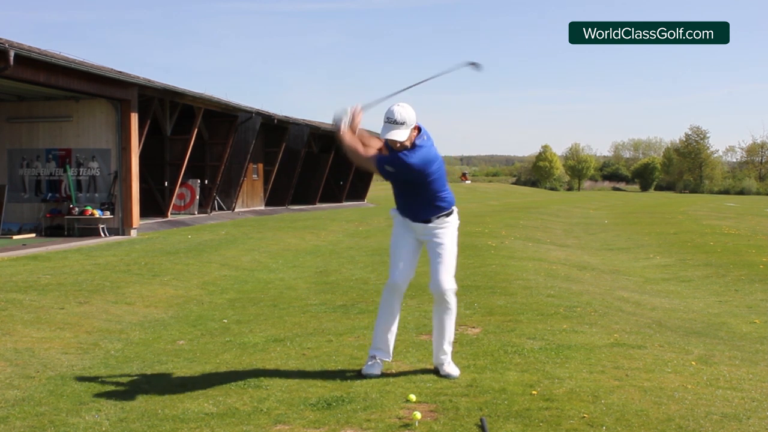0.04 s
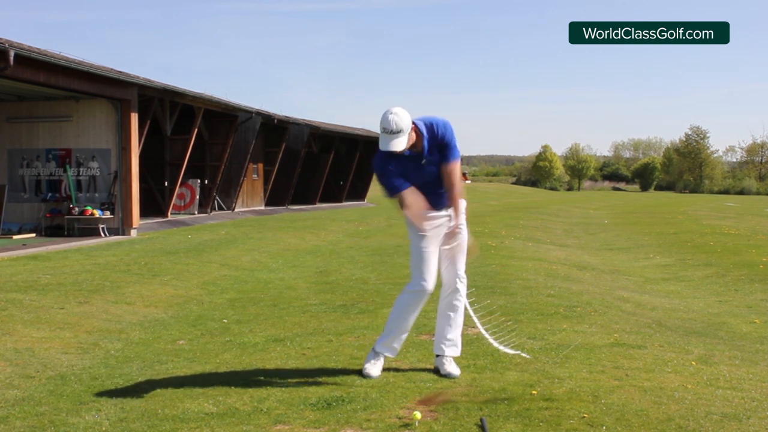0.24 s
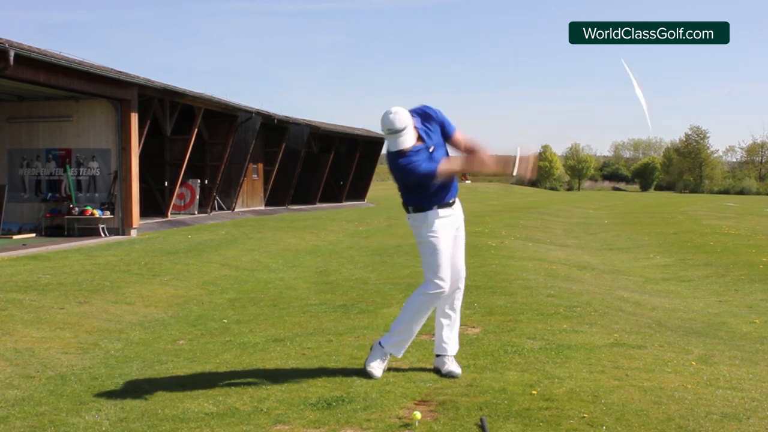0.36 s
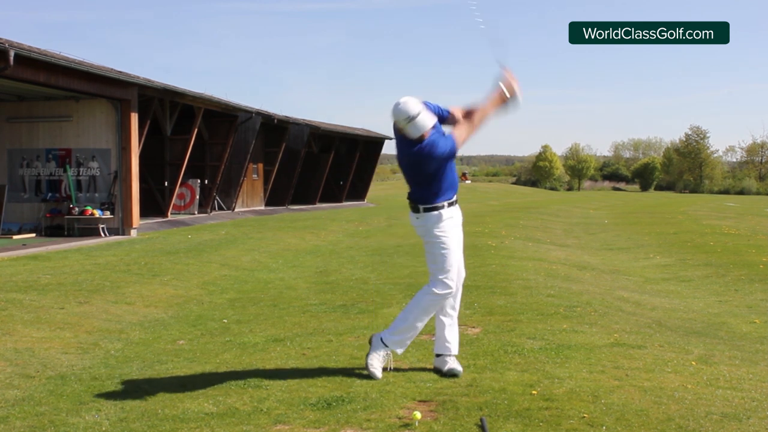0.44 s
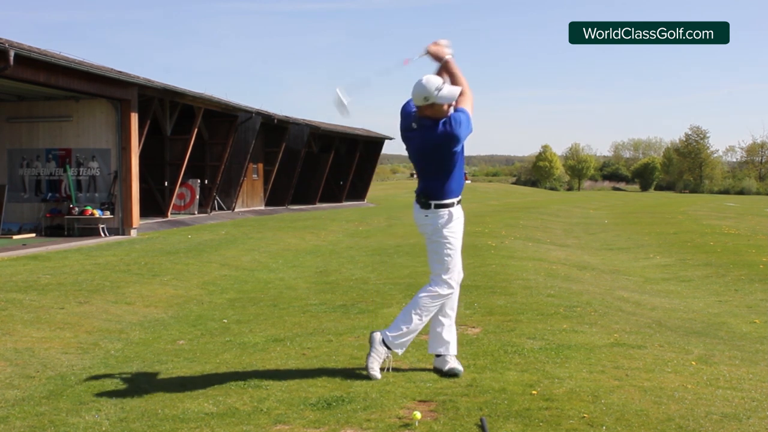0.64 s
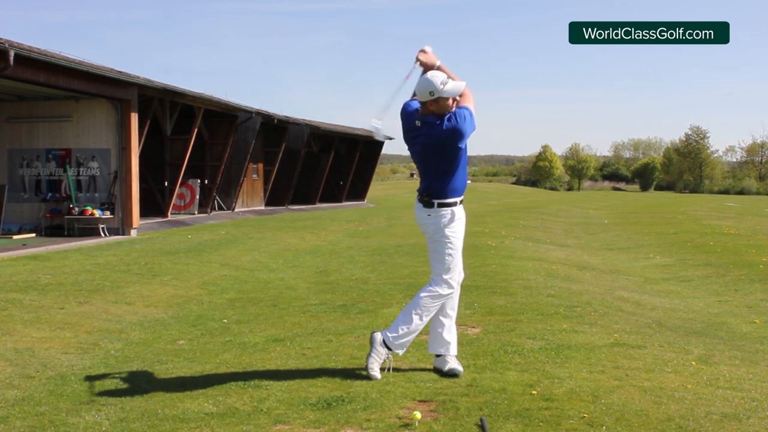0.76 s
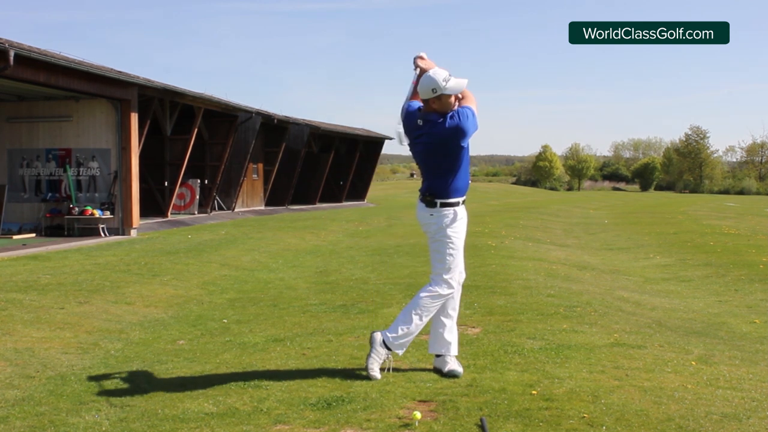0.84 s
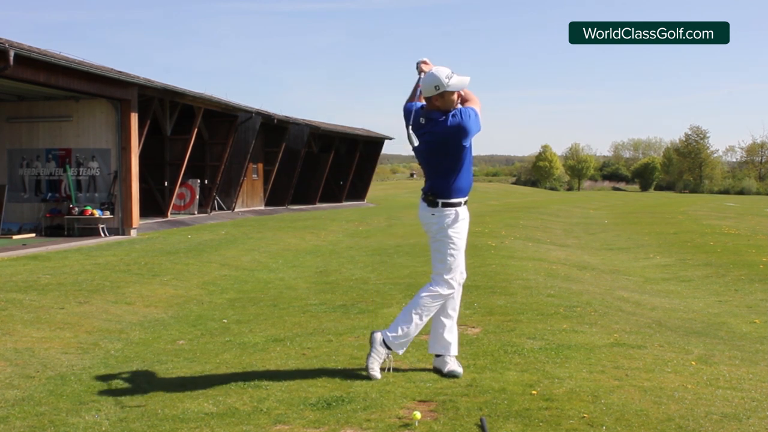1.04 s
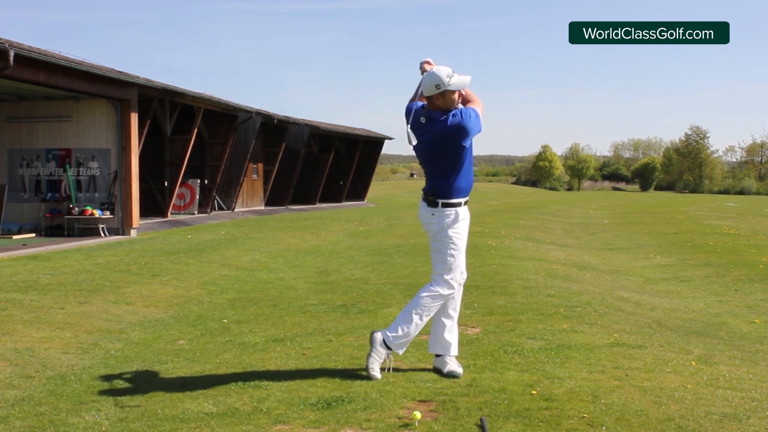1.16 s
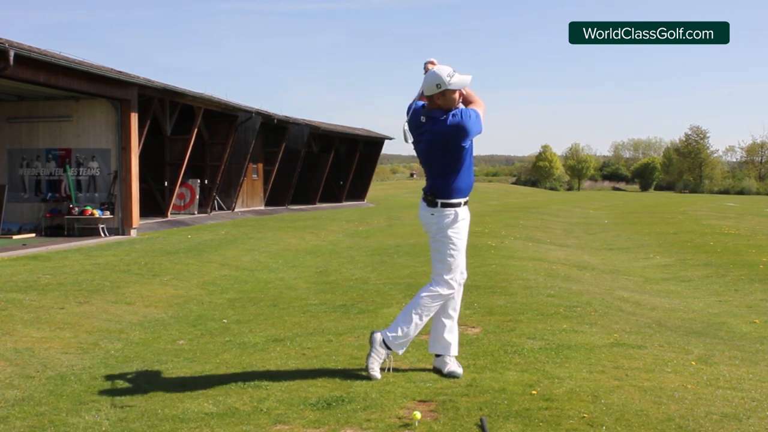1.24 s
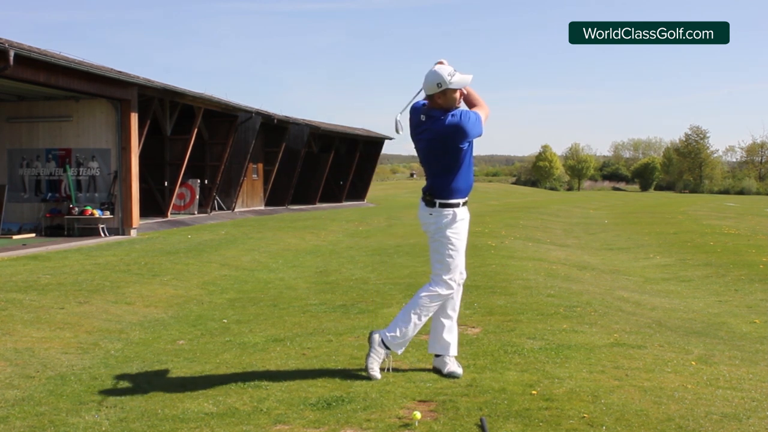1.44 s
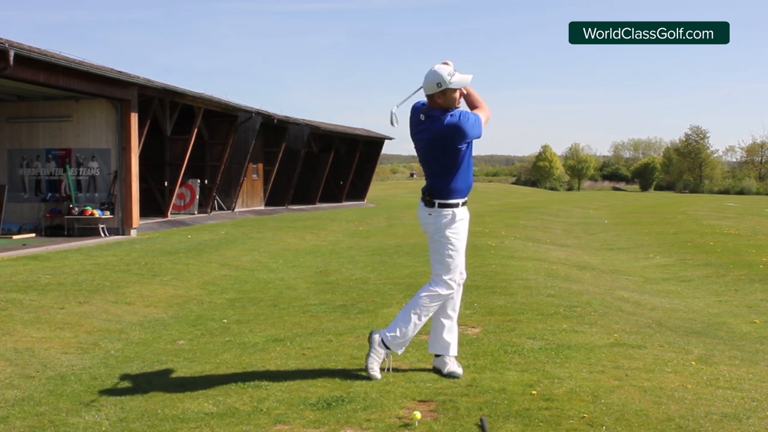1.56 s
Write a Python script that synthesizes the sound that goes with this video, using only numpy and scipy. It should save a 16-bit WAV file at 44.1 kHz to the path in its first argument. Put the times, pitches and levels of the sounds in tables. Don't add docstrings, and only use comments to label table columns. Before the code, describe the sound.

A golf club whooshes down and cracks a ball off turf, then cloth rustles and wind thumps.

```python
import sys
import numpy as np
from scipy import signal
from scipy.fft import rfft, irfft
from scipy.io import wavfile
from scipy.ndimage import uniform_filter1d, map_coordinates

SR = 44100
rng = np.random.default_rng(int(sys.argv[2]) if len(sys.argv) > 2 else 0)


def wav_record(signal):
    frames = np.transpose(np.atleast_2d(signal))
    bounded = np.clip(frames, -1, 1)
    quanta = np.round(bounded * 32767).astype(np.int16)
    wavfile.write(sys.argv[1], SR, quanta)


def natural_amplitude(level_db):
    exponent = np.asarray(level_db, float) / 20
    return 10 ** exponent


N = 70560

STRIKE_S, ECHO_S = .24595, .2843

# frequency in Hz, level in dB per Hz.
FIELD_COLOUR = [(20, -9), (90, -12), (300, -17), (600, -21), (1100, -24.5), (3000, -30.5), (11000, -29.5),
                (16000, -30)]
# time in seconds, level in dB.
RUSTLE_LEVEL = [(0, -57), (.03, -55.5), (.05, -51), (.078, -43.5), (.095, -42.5), (.1, -52.5), (.135, -54),
                (.16, -45), (.18, -50), (.27, -45), (.315, -52.5), (.365, -48.5), (.443, -57.5),
                (.456, -48.5), (.478, -54), (.6, -56.5), (.72, -63.5), (1.6, -70)]
# frequency in Hz, level in dB per Hz.
CLOTH_COLOUR = [(210, 2.5), (350, -0.5), (1200, -4), (3500, -4), (5500, -6.5), (9000, -7), (13600, -5),
                (16000, -14)]
# time in seconds, level in dB.
BUFFET_LEVEL = [(0, -71), (.04, -47.5), (.08, -46.5), (.15, -36), (.175, -54.5), (.25, -29), (.29, -33.5),
                (.35, -43.5), (.4, -51.5), (.44, -47.5), (.52, -46), (.59, -48), (.62, -52), (.66, -50),
                (.7, -56), (.9, -72), (1.2, -61), (1.6, -79.5)]
# frequency in Hz, level in dB per Hz.
AIR_COLOUR = [(12, -54.5), (20, -8), (85, -1), (135, -4.5), (172, -5), (286, -14.5), (316, -18.5),
              (600, -30.5), (780, -67.5), (1320, -120)]
# time in seconds, level in dB.
SCUFF_LEVEL = [(0, -61.5), (.02, -56), (.06, -58), (.3, -52), (.37, -50.5), (.42, -60.5), (.7, -96),
               (.8, -76.5), (.86, -63.5), (.95, -78.5), (1.22, -74), (1.3, -68), (1.37, -78), (1.6, -88)]
# frequency in Hz, level in dB per Hz.
TURF_COLOUR = [(300, -32.5), (500, -4), (1000, 5), (1800, -2.5), (2500, -12.5), (5000, -60.5)]
# centre in seconds, peak in dB, pitch in Hz, signed direction (a factor).
AIR_SHOVES = [(0.072, -34.5, 79.6, -1.3), (.086, -28.5, 91, -1.04), (0.116, -32.5, 97, -0.62),
              (0.147, -41, 64.5, -0.72), (0.417, -44, 117, -1.25), (0.45, -40, 131, 1),
              (0.4671, -38, 132, -0.7), (.48, -40, 153, -1.2), (.488, -37, 102, -1),
              (0.507, -29.5, 81, 0.97), (0.5213, -34, 172, 1), (.558, -36.5, 110, -1.03),
              (.629, -41, 110, 1), (.531, -29, 117, 1), (0.544, -31.5, 125, -1.16),
              (0.573, -31, 124, -0.95), (0.595, -38, 68, -1.14), (0.65, -32, 74, 0.77),
              (0.673, -48, 126, 1), (0.8594, -46.5, 258, -1.1), (0.7536, -48.5, 220, -1.05),
              (.3135, -32, 121, 0.81), (0.331, -33.5, 119, 0.75), (0.341, -38, 90, -1), (0.369, -41, 90, 1),
              (.377, -38, 90, -0.94), (1.19, -58, 78.7, 0.43), (1.218, -50.5, 112, 0.77),
              (1.266, -51.5, 80, 1), (1.32, -54.5, 90, 0.67), (0.441, -39, 75, -1.2),
              (0.039, -41, 71, -0.79), (0.879, -49, 98, 0.98)]
# start in
# seconds, level in dB, centre in Hz, length in seconds.
GRIT_SNAPS = [(.06, -48, 13500, .004), (.068, -47, 11500, .028), (.0715, -38, 11500, .003),
              (.0928, -39, 13500, .003), (.2467, -11, 10300, .0008), (.2545, -36, 14000, .006),
              (.2665, -34, 10500, .004), (.277, -39, 11500, .002), (.28, -39, 12000, .002),
              (.289, -42, 11000, .004), (.301, -38, 14500, .002), (.3535, -40, 11500, .002),
              (.36, -41, 9500, .0015), (.363, -45, 9300, .002), (.3788, -43, 9500, .002),
              (.3845, -45, 4200, .0012), (.372, -49, 4300, .002), (.285, -36, 520, .008),
              (1.33, -63, 370, .035), (.857, -56, 550, .006), (.345, -50, 350, .025),
              (.535, -48, 310, .015), (.113, -48, 420, .012), (.686, -58, 6000, .002)]
# start in seconds, peak in dB, pitch in Hz.
CREASE_TICKS = [(0.095, -33, 13100), (.102, -34.5, 2500), (0.6627, -41.5, 1750), (.663, -51, 4580),
                (0.686, -54, 5000), (0.754, -40, 1510), (0.782, -43.5, 1500), (.781, -38, 7150),
                (0.821, -45.5, 1320), (0.859, -49, 705), (1.093, -44.5, 6000), (1.55, -36, 12860)]
# time in seconds, shedding pitch in Hz, level in dB.
SWING_PATH = [
    (.15, 340, -58),
    (.183, 420.8, -44),
    (.2, 469, -41.5),
    (.222, 580, -33),
    (.2415, 733, -35),
    (.246, 760, -39),
]
# frequency in Hz, level in dB per Hz.
SWISH_COLOUR = [(150, -28.5), (300, -11), (1000, -4.5), (2940, -7.5), (5700, -13), (11700, -21.5),
                (16000, -28)]
# centre in seconds, peak in dB, pitch in Hz, half-length in seconds.
VORTEX_TRAINS = [(.1885, -35, 430, .004), (.197, -30, 480, .005), (.2085, -25, 410, .004),
                 (.2145, -28, 480, .003), (.2225, -21, 600, .004), (.228, -28, 540, .002),
                 (.2335, -28, 600, .002), (.2372, -24, 880, .002), (.2385, -25, 480, .003),
                 (.2413, -15, 630, .0024), (.2453, -25, 700, .001)]
# pitch in Hz, level in dB, t60 in seconds, attack in seconds.
FACE_MODES = [(1178, 5.5, 0.0075, 0.000206), (642, -9, 0.0095, .00036), (3554, -7, 0.0041, .001),
              (324.4, -14.5, 0.0093, 0.0012), (141.1, -15, .016, 0.00091), (11360, -11, 0.00565, .001),
              (6400, -22, .005, .001), (14500, -23, 0.003, .0015)]
# pitch in Hz, level in dB, t60 in seconds, attack in seconds.
HEAD_MODES = [(2500, -13.5, 0.00702, 0.0006), (3250, 1, 0.0086, 0.0032), (3527, -21.5, 0.021, 0.0026),
              (4330, -7.5, 0.0057, 0.000296), (4627, -4, 0.0053, .0008), (5056, 5.5, 0.0052, 0.00303),
              (6960, -19.5, 0.0074, 0.00062), (8530, -8, 0.0051, 0.0017), (12360, -20, 0.0053, 0.00066),
              (13500, -19, 0.00762, 0.0006), (1776, -15.5, 0.01098, .001)]
# pitch in Hz, level in dB, t60 in seconds, attack in seconds.
WALL_MODES = [(2660, 9.5, .0045, .0003), (2100, -2.5, 0.014, 0.00068), (3310, -3.5, 0.013, 0.00055),
              (5000, -17, .014, 0.00089), (11950, -10, 0.0067, 0.000322), (14200, -11, .008, .0003)]
# start in seconds, length in seconds, level in dB, pitch in Hz, opening drop in Hz.
BIRD_CALLS = [
    (.586, .078, -59.5, 3660, 40),
    (.937, .085, -65.5, 3690, 240),
    (1.142, .078, -65, 3680, 330),
    (1.491, .088, -63, 3695, 280),
]
# time in seconds, pitch in Hz, level in dB.
FAR_WHISTLE = [
    (1.36, 2010, -73),
    (1.38, 1980, -76),
    (1.458, 1880, -74),
    (1.512, 1925, -77),
    (1.548, 2100, -79.5),
    (1.565, 2150, -85),
]
# frequency in Hz, level in dB per Hz.
SIDE_HISS_COLOUR = [(60, 3), (250, 2.5), (2000, 1), (8000, 1), (16000, 0.5)]
CHANNEL_OFFSET = [-.0037, -.0003]


def unit(x):
    return x / np.sqrt(np.mean(x ** 2) + 1e-20)


def curves(rows):
    s, *cols = np.transpose(rows)
    return [np.interp(np.arange(N) / SR, s, c) for c in cols]


def wobble(rate):
    knots = rng.standard_normal(int(N * rate / SR) + 4)
    return map_coordinates(knots, [np.arange(N) * rate / SR])


def noise(colour, patchy_db):
    z = signal.stft(rng.standard_normal(N), nperseg=256)[2]
    patches = uniform_filter1d(uniform_filter1d(rng.standard_normal(z.shape), 8, 0), 6, 1)
    x = signal.istft(z * natural_amplitude(patchy_db * unit(patches)), nperseg=256)[1][:N]
    hz, db = np.transpose(colour)
    tilt_db = np.interp(np.log(np.fft.rfftfreq(N, 1 / SR) + 1), np.log(hz + 1), db)
    return unit(irfft(rfft(x) * natural_amplitude(tilt_db), N))


def add(x, s, part):
    seg = x[round(s * SR):][:len(part)]
    seg += part[:len(seg)]


def field():
    return natural_amplitude(-61 + 0.92 * wobble(5.2)) * noise(FIELD_COLOUR, patchy_db=1.0)


def rustle():
    return natural_amplitude(curves(RUSTLE_LEVEL)[0] + 1.7 * wobble(60)) * noise(CLOTH_COLOUR, patchy_db=1.0)


def buffet():
    lumps = natural_amplitude(2.6 * wobble(30)) * noise(AIR_COLOUR, patchy_db=0.0)
    return natural_amplitude(curves(BUFFET_LEVEL)[0]) * unit(lumps)


def shoes():
    crackle = natural_amplitude(3 * wobble(90.25)) * noise(TURF_COLOUR, patchy_db=0.0)
    return natural_amplitude(curves(SCUFF_LEVEL)[0]) * unit(crackle)


def shoves():
    t = np.arange(N) / SR
    x = np.zeros(N)
    for s, db, hz, way in AIR_SHOVES:
        bell = np.exp(-((t - s) * hz / 0.63) ** 2)
        x += way * natural_amplitude(db) * bell * np.cos(2 * np.pi * hz * (t - s))
    return x


def grit():
    x = np.zeros(N)
    for s, db, hz, length in GRIT_SNAPS:
        t = np.arange(round(length * SR)) / SR
        a, b = (map_coordinates(dice, [t * hz * 0.52], mode="mirror") for dice in rng.standard_normal((2, 400)))
        hiss = unit(a * np.cos(2 * np.pi * hz * t) + b * np.sin(2 * np.pi * hz * t))
        add(x, s, natural_amplitude(db) * np.sin(np.pi * np.sqrt(t / length)) * hiss)
    return x


def ticks():
    x = np.zeros(N)
    t = np.arange(SR // 40) / SR
    for s, db, hz in CREASE_TICKS:
        jitter = 0.44 * np.cumsum(rng.standard_normal(len(t))) * hz / SR * 4
        fade_db = 30 * t * hz / 3
        add(x, s, natural_amplitude(db - fade_db) * np.sin(2 * np.pi * hz * t + jitter))
    return x


def whoosh():
    t = np.arange(N) / SR
    hz, db = curves(SWING_PATH)
    turn = 2 * np.pi * np.cumsum(hz + 55 * wobble(120)) / SR

    def narrow(k):
        rate = k * 2 * 220
        return unit(wobble(rate) * np.cos(k * turn) + wobble(rate) * np.sin(k * turn))

    steady = 0.2
    tone = np.sqrt(2 * steady) * np.sin(turn) + np.sqrt(1 - steady) * narrow(0.96) + natural_amplitude(-18) * narrow(1.6)
    swish_db = -29.5 + 328 * np.minimum(t - STRIKE_S, 0) + wobble(140)
    swish = natural_amplitude(swish_db) * noise(SWISH_COLOUR, patchy_db=1)
    fade_in = np.clip((t - .13) / 0.025, 0, 1)
    stop = natural_amplitude(-60 * np.clip(t - STRIKE_S, 0, 1) / .02)
    x = (natural_amplitude(db) * tone + trains() + swish) * fade_in * stop
    return x + natural_amplitude(-14.5) * np.roll(x, round((ECHO_S - STRIKE_S) * SR))


def trains():
    t = np.arange(N) / SR
    x = np.zeros(N)
    for s, db, hz, half in VORTEX_TRAINS:
        glide_hz = hz + 6000 * (t - s) / 2
        x += natural_amplitude(db) * np.exp(-((t - s) / half) ** 2) * np.cos(2 * np.pi * glide_hz * (t - s))
    return x


def ring(modes, puff_db, puff_t60):
    t = np.arange(SR // 10) / SR
    puff = 2 * uniform_filter1d(rng.standard_normal(len(t)), size=3)
    x = natural_amplitude(puff_db - 60 * t / puff_t60) * (1 - np.exp(-t / 0.00041)) * puff
    for hz, db, t60, attack in modes:
        x -= natural_amplitude(db - 60 * t / t60) * (1 - np.exp(-t / attack)) * np.sin(2 * np.pi * hz * t)
    return x


def strike():
    x = np.zeros(N)
    add(x, STRIKE_S, natural_amplitude(7) * ring(FACE_MODES, puff_db=-20.5, puff_t60=0.022))
    add(x, STRIKE_S + .0024, natural_amplitude(4.5) * ring(HEAD_MODES, puff_db=-8.5, puff_t60=0.0044))
    add(x, ECHO_S, natural_amplitude(-17.5) * ring(WALL_MODES, puff_db=-13, puff_t60=0.019))
    return x


def bird_calls():
    x = np.zeros(N)
    for s, length, db, note_hz, drop_hz in BIRD_CALLS:
        t = np.arange(round(length * SR)) / SR
        drop = drop_hz * np.exp(-t / .005)
        lift = 90 * np.exp((t - length) / .012)
        hz = note_hz + drop + lift - 700 * t
        edge = np.clip(np.minimum(t, length - t) / .005, 0, 1)
        level = natural_amplitude(db - 6 * t / length + 1.6 * wobble(88)[:len(t)])
        add(x, s, np.sqrt(2) * level * edge * np.sin(2 * np.pi * np.cumsum(hz) / SR))
    return x


def far_whistle():
    t = np.arange(N) / SR
    hz, db = curves(FAR_WHISTLE)
    sounding = (t > FAR_WHISTLE[0][0]) * (t < FAR_WHISTLE[-1][0])
    return np.sqrt(2) * natural_amplitude(db + 1.3 * wobble(41.93)) * np.sin(2 * np.pi * np.cumsum(hz) / SR) * sounding


def scene():
    grass = field()
    club = whoosh() + strike()
    body = rustle() + buffet() + ticks() + shoves() + shoes()
    birds = far_whistle() + bird_calls()
    return np.tile(grass + club + body + birds + grit(), (2, 1))


def band_limit(x):
    return signal.sosfilt(signal.butter(12, 16800, fs=SR, output="sos"), x)


def record(dry):
    clip, knee = 0.28, 14
    x = dry / (1 + np.abs(dry / clip) ** knee) ** (1 / knee)
    hiss = natural_amplitude(-65.5) * noise(SIDE_HISS_COLOUR, patchy_db=-1) * np.array([[1], [-1]])
    x = x + hiss + np.array(CHANNEL_OFFSET)[:, None]
    after = np.clip(np.arange(N) / SR - STRIKE_S, 0, 9)
    fall = 1 - np.exp(-(after / 0.013) ** 2)
    recovery = np.exp(-(after / 0.093) ** 2 / 2)
    x = natural_amplitude(-14 * fall * recovery) * x
    x = irfft(rfft(x) * (np.fft.rfftfreq(N, 1 / SR) < 15820), N)
    return band_limit(x)


dry = scene()
out = record(dry)
wav_record(out)
```